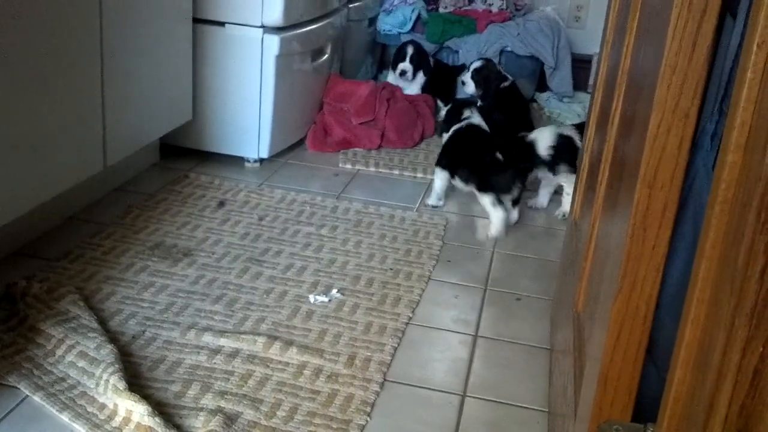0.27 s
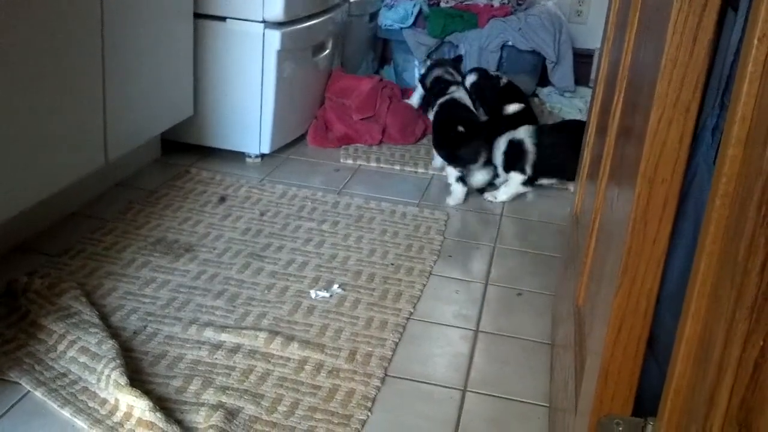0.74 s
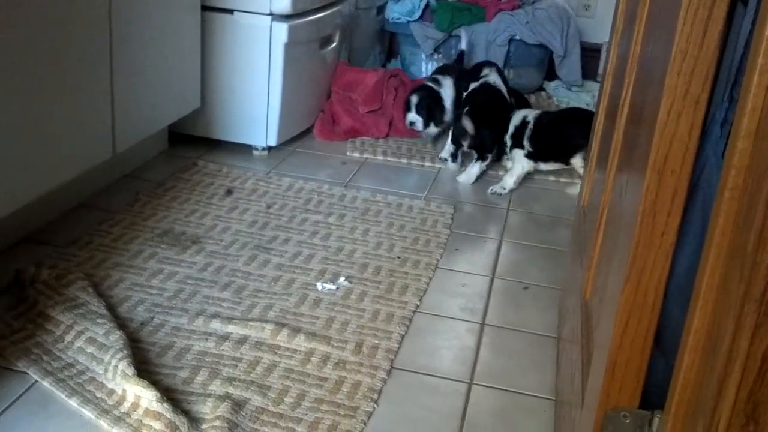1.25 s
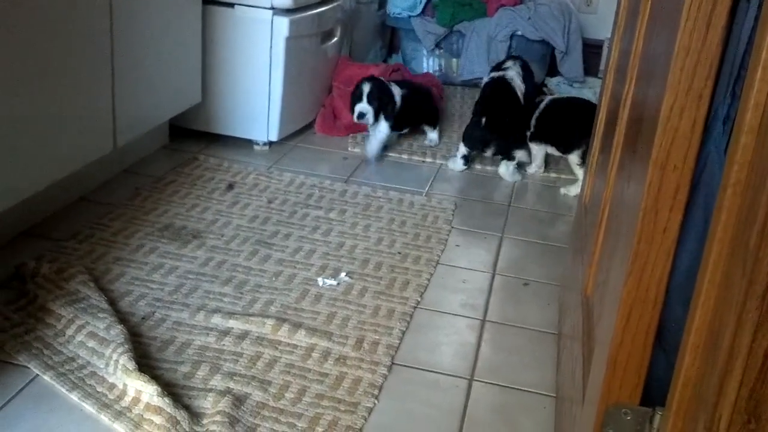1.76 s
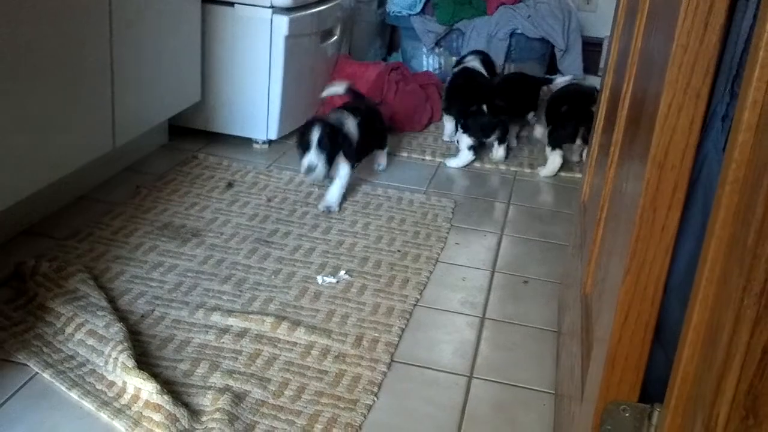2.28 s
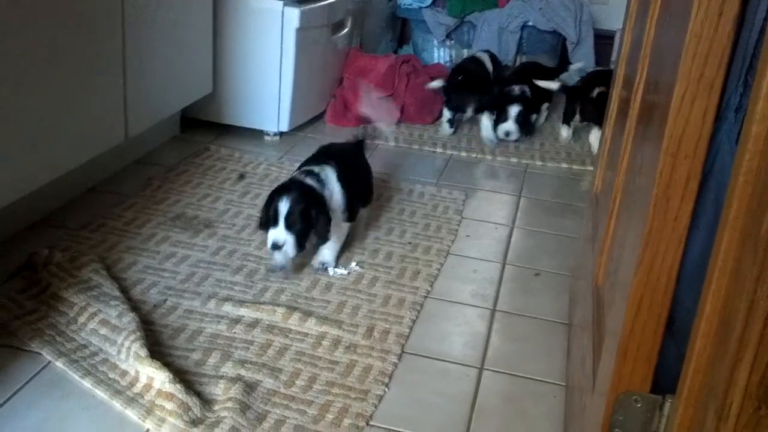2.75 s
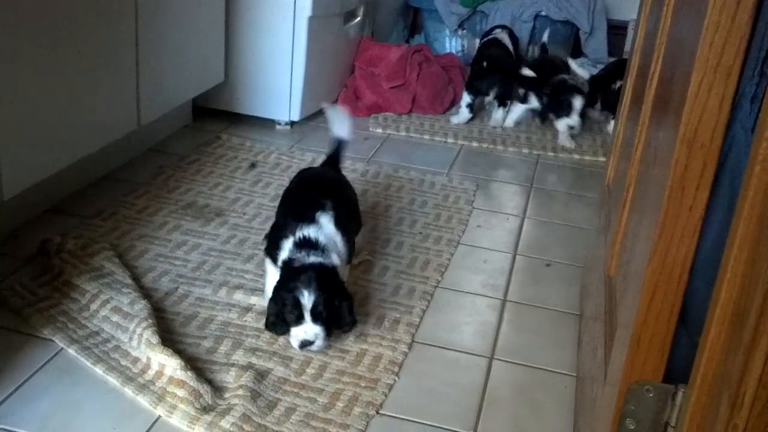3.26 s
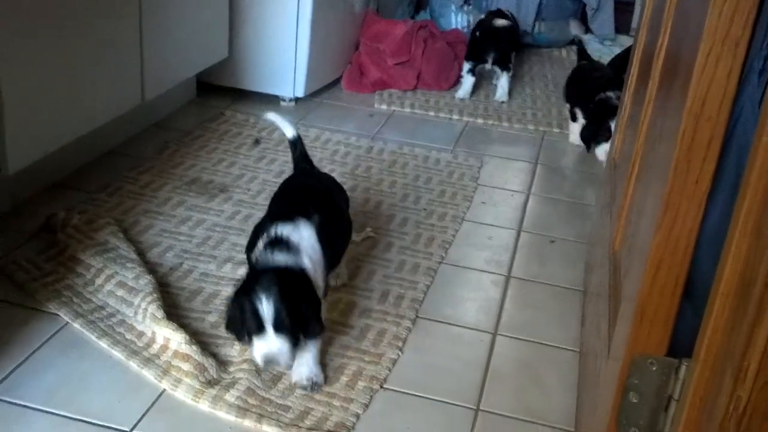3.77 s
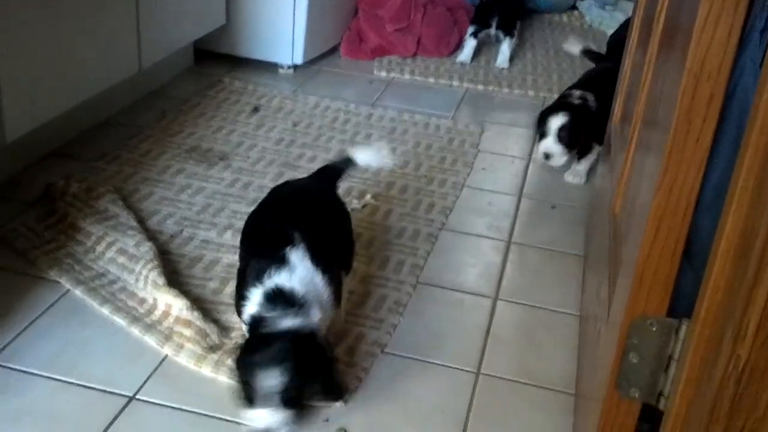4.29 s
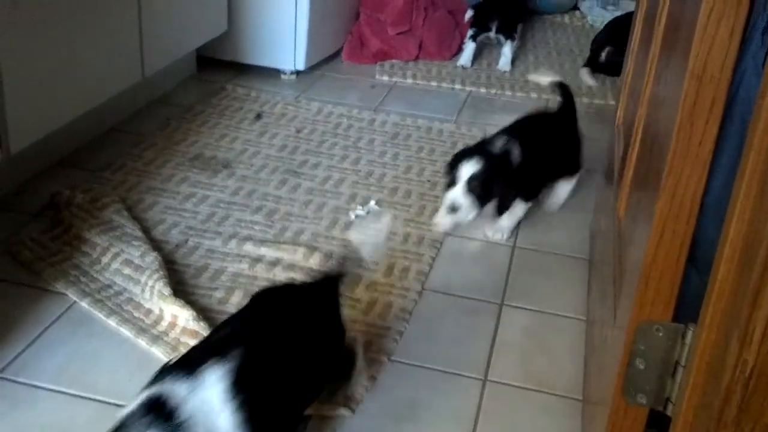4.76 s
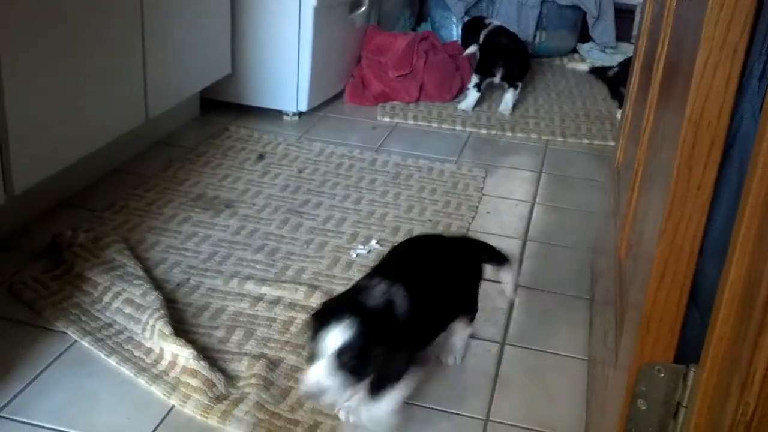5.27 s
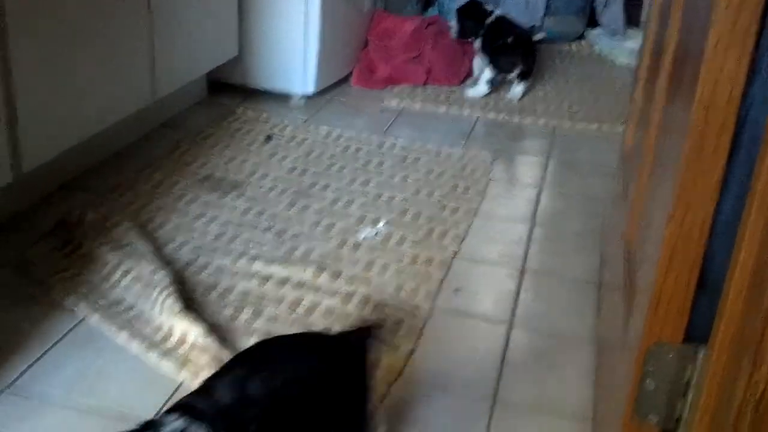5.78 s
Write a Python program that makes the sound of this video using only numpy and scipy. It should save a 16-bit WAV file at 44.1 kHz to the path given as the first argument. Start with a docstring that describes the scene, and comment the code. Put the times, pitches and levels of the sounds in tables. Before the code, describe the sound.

In a small tiled laundry room with a low, steady appliance rush, a puppy across the room gives short high squeals with thin whistling edges, then two louder cracked yelps. Lower whimpers follow as soft paws pad over a rug. Claws tick on the tile, sparse at first, then quickly, and a puppy scuffles loudly against the nearby stereo microphone with rubbing, scraping and bumps.

```python
"""A small tiled laundry room where an appliance hums and puppies tussle.
One whines across the room in a string of squeals and two cracked yelps: uneven vocal folds give
a throat tone, and air through the narrowed throat adds thin, very high whistles.
Another pads over the rug in puffs of noise and claws tick on tile as struck resonances.
One scuffles right beside the two-port microphone: rubbed fur, dragged claws, bumps and skids."""
import sys
import numpy as np
from scipy import signal
from scipy.fft import rfft, irfft, next_fast_len
from scipy.io import wavfile
from scipy.ndimage import uniform_filter1d

SR = 44100
rng = np.random.default_rng(int(sys.argv[2]) if len(sys.argv) > 2 else 0)


def inscribe(sig):
    """Save sig as 16-bit PCM at rate SR to the path in sys.argv[1].

    A 1-D sig is mono; a 2-D sig holds one channel per row.
    Samples are clipped to [-1, 1] before scaling.
    """
    pcm = np.round(np.clip(np.atleast_2d(sig).T, -1, 1) * 32767)
    wavfile.write(sys.argv[1], SR, pcm.astype(np.int16))


N = 265923
TIME = np.arange(N) / SR
PORT_SAMPLES = 16  # time sound takes from one port to the other, in samples
PORT_SIGNS = np.array([[1], [-1]])  # left port, right port

# air forced through the throat: f/Hz, relative level/dB
RASP_SPECTRUM = [(700, -27), (3000, -25), (4500, -23), (7000, 16.5), (10000, 13), (15000, 3)]


def from_db(db):
    """Decibels to gain."""
    return 10 ** (np.asarray(db) / 20)


def rms_one(x):
    """Scale to unit rms."""
    return x / np.sqrt(np.mean(x ** 2) + 1e-20)


def at_hz(points, hz):
    """Read a spectrum on a log-frequency axis."""
    f, value = np.transpose(points)
    return np.interp(np.log(np.maximum(hz, 1)), np.log(f), value)


def colour(x, spectrum):
    """Shape a signal by a spectrum in dB."""
    size = x.shape[-1]
    hz = np.fft.rfftfreq(size, 1 / SR)
    return irfft(rfft(x) * from_db(at_hz(spectrum, hz)), size)


def noise(spectrum):
    """Coloured noise of unit rms."""
    white = rng.standard_normal(next_fast_len(N))
    return rms_one(colour(white, spectrum)[:N])


def wander(t, rate):
    """Random motion around zero: straight lines between normal draws, `rate` draws a second."""
    knots = np.arange(0, N / SR + 1, 1 / rate)
    return np.interp(t, knots, rng.standard_normal(SR)[:len(knots)])


def resonate(x, modes):
    """A struck or rubbed body as parallel two-pole resonances of alternating sign."""
    out = 0
    for k, (hz, width, db) in enumerate(modes):
        r = np.exp(-np.pi * width / SR)
        poles = [1, -2 * r * np.cos(2 * np.pi * hz / SR), r * r]
        ring = signal.lfilter([1, 0, -1], poles, x + 1e-18)
        out = out + (-1) ** k * from_db(db) * (1 - r * r) / 2 * ring
    return out


def diffuse(size):
    """Spectra of white sound from all sides at the two ports: alike in the bass, unrelated above."""
    hz = np.fft.rfftfreq(size, 1 / SR)
    alike = np.sinc(2 * hz * PORT_SAMPLES / SR)
    mid, side = rfft(rng.standard_normal((2, size)))
    return hz, np.sqrt((1 + alike) / 2) * mid + np.sqrt((1 - alike) / 2) * side * PORT_SIGNS


def in_room(x, bearing, wet_db):
    """Direct sound from a bearing (-1 left to 1 right) plus the tiled room's tail, dying band by band."""
    # reverberation time: f/Hz, time to fall 60 dB/s
    decay_times = [(150, 0.2), (1200, 0.34), (4000, 0.28), (7000, 0.28), (14000, 0.16)]
    t = TIME[:SR // 2]
    hz, field = diffuse(len(t))
    band = np.round(np.log2(np.maximum(hz, 125)))
    tail = 0
    for octave in np.unique(band):
        decay = from_db(-60 * t / at_hz(decay_times, 2 ** octave))
        tail = tail + irfft(field * (band == octave), len(t)) * decay
    tail = tail * np.clip((t - .002) / 0.00039, 0, 1)  # the tail sets in after 2 ms
    response = from_db(wet_db) * tail / np.sqrt(np.sum(tail ** 2) / 2)
    taps = np.arange(2 * PORT_SAMPLES)
    arrival = PORT_SAMPLES * (1 + np.clip(bearing, -1, 1) * PORT_SIGNS / 2)
    response[:, taps] += np.sinc(taps - arrival)  # the nearer port hears it first
    response = response / np.sqrt(1 + from_db(2 * wet_db))  # direct and tail share unit energy
    return signal.fftconvolve(x[None], response, axes=1)[:, :N]


def appliance(hum_db, waver, direct_db=-3.0, left_bearing=0.51):
    """A steady rush of air fills the room, part of it straight from the left, with wavering motor lines."""
    # rush of air: f/Hz, relative level/dB
    air_spectrum = [(25, -40), (50, -18), (85, -15.5), (120, -1.5), (200, 3), (400, -3), (700, -4.5),
                    (1200, -11.5), (2200, -15), (4000, -23), (7000, -27), (11000, -31), (15000, -25.5)]
    # motor hum: f/Hz, relative rms level/dB
    hum_lines = [(118.4, -57.5), (209.5, -58.5), (269.2, -58.5), (360.7, -53.5), (479.1, -55),
                 (586.8, -60.5)]
    air_db, direct_top_hz = -42.5, 1100  # only the low rush comes straight
    size = next_fast_len(N)
    hz, field = diffuse(size)
    lead = PORT_SAMPLES * np.clip(left_bearing, -1, 1) * PORT_SIGNS
    from_left = np.exp(1j * np.pi * hz / SR * lead)
    direct = from_db(direct_db) * rfft(rng.standard_normal(size)) * from_left
    direct = direct / (1 + (hz / direct_top_hz) ** 4)
    air = rms_one(irfft((field + direct) * from_db(at_hz(air_spectrum, hz)), size)[:, :N])
    hum = 0
    for f, db in hum_lines:
        phase = 2 * np.pi * f * TIME + waver * wander(TIME, 9)
        hum = hum + np.sqrt(2) * from_db(db) * np.sin(phase)
    return from_db(air_db) * air + from_db(hum_db) * hum


def paws(rise_s, fall_s):
    """Pads press the rug and tile in short, soft puffs of noise."""
    # soft paw falls: t/s, relative level/dB
    falls = [(2.054, -51), (2.425, -55), (2.937, -48.5), (3.382, -51), (3.54, -48.5), (3.657, -48.5),
             (3.872, -51), (3.901, -48.5), (5.115, -52)]
    # colour of a paw fall: f/Hz, relative level/dB
    pad_spectrum = [(100, -23), (300, -27), (700, 14.5), (1500, 11.5), (2300, 6.5), (4000, -45),
                    (15000, -83)]
    press = 0
    for s, db in falls:
        age = np.maximum(TIME - s, 0)
        puff = (1 - np.exp(-age / rise_s)) * np.exp(-np.minimum(age / fall_s, 20))
        press = press + from_db(db) * puff
    return press * noise(pad_spectrum)


def contact(s, db, length, modes, scratch):
    """A sharp tap and a brief gritty scratch, ringing the modes."""
    grit_db = 4.5
    t = TIME[:SR // 8]
    grit = rng.standard_normal(len(t)) * from_db(grit_db * wander(t, 1500))
    hit = scratch * rms_one(grit) * np.exp(-t / length)
    hit[0] = 1  # the tap itself
    tap_peak = np.abs(resonate(signal.unit_impulse(len(t)), modes)).max()
    out, start = np.zeros(N + SR), int(s * SR)
    out[start:start + len(t)] = from_db(db) * resonate(hit, modes) / tap_peak
    return out[:N]


def contacts(rows, modes, scratch):
    """A run of contacts on the same body."""
    return sum(contact(s, db, length, modes, scratch) for s, db, length in rows)


def landings(scratch):
    """Paws land with the body's weight on them and the floor answers with one low mode."""
    # landings: t/s, relative tap level/dB, scratch length/s
    landing_rows = [(2.05, -27, 0.0091), (2.42, -23.5, 0.0031)]
    # floor resonance: f/Hz, width/Hz, level/dB
    floor_modes = [(210, 64, 0)]
    return contacts(landing_rows, floor_modes, scratch)


def claw_ticks(scratch):
    """Claws and hard contacts crack, each with a broad ring of its own over the tile's modes."""
    # ticks: t/s, relative tap level/dB, scratch length/s, own ring f/Hz
    ticks = [(2.044, -32.5, 0.0052, 4000), (2.407, -42, 0.014, 4000), (4.6932, -11.5, 0.001, 6670),
             (4.715, -24, 0.0017, 4000), (4.822, -36, 0.0027, 7000), (4.9742, -8.5, 0.001, 3900),
             (5.136, -37.5, 0.034, 3560), (5.4825, -15, 0.0013, 3900), (5.494, -17.5, 0.0027, 6850),
             (5.597, -11, 0.00016, 4130), (5.612, -11, 0.00085, 3900), (5.65, -15, 0.0011, 3700),
             (5.6644, -8.5, 0.00089, 3800)]
    # tile resonances: f/Hz, width/Hz, level/dB
    tile_modes = [(1840, 1700, 8.5), (4000, 2700, 11), (6660, 5200, 12), (9800, 2700, 11),
                  (14600, 2200, 10)]
    ring_width_hz, ring_db = 650, 15
    out = 0
    for s, db, length, ring_hz in ticks:
        modes = [(ring_hz, ring_width_hz, ring_db)] + tile_modes
        out = out + contact(s, db, length, modes, scratch)
    return out


def bumps(scratch):
    """Dull bumps close by: taps and scratches ring broad low and middle modes."""
    # bumps: t/s, relative tap level/dB, scratch length/s
    bump_rows = [(5.599, -24, 0.0004), (5.742, -18.5, 0.0093), (5.767, -19, 0.0073), (5.791, -20, 0.0059),
                 (5.834, -18, 0.001), (5.9202, -6.5, 0.0013), (5.9285, -12, 0.002), (5.965, -15, 0.0015)]
    # resonances of the bumped body: f/Hz, width/Hz, level/dB
    bump_modes = [(366, 70, 7), (1120, 370, 9), (1620, 910, 4.5), (2530, 450, -8)]
    return contacts(bump_rows, bump_modes, scratch)


def skids(scratch):
    """Paws skid and a narrow resonance gives each a short squeak."""
    # skids: t/s, relative tap level/dB, scratch length/s
    skid_rows = [(5.841, -14.5, 0.0043), (5.883, -9.5, 0.0058)]
    # squeak resonances: f/Hz, width/Hz, level/dB
    squeak_modes = [(2520, 207, 6), (3920, 780, -4)]
    return contacts(skid_rows, squeak_modes, scratch)


def thuds(scratch):
    """A body slumps against the floor and rings one low mode."""
    # slumps: t/s, relative tap level/dB, scratch length/s
    thud_rows = [(5.945, -22.5, 0.024)]
    # resonance of the slump: f/Hz, width/Hz, level/dB
    thud_modes = [(437, 77, 0)]
    return contacts(thud_rows, thud_modes, scratch)


def strokes(rows):
    """Pressure of sliding strokes: each builds to its peak and dies away."""
    pressure = 0
    for s, db, rise, fall in rows:
        distance = np.maximum((s - TIME) / rise, (TIME - s) / fall)
        pressure = pressure + from_db(db) * np.exp(-np.minimum(distance, 20))
    return pressure


def scuffle(slip_db, snags_per_s=220, crackle_db=-6):
    """Fur rubs in grains and snags in tiny ticks; dragged claws stick and slip and ring a surface."""
    # fur rubbing past, a row a stroke: peak t/s, relative level/dB, rise/s, fall/s
    rubs = [(5.505, -44.5, 0.0068, 0.05), (5.596, -26, 0.032, 0.011), (5.675, -23, 0.021, 0.04),
            (5.762, -26, 0.018, 0.03), (5.92, -37.5, 0.081, 0.015)]
    # claws dragged along, a row a stroke: peak t/s, relative level/dB, rise/s, fall/s
    drags = [(5.60, -31.5, 0.13, 0.0089), (5.659, -11.5, 0.013, 0.0096), (5.676, -8.5, 0.0075, 0.019)]
    # rubbed fur: f/Hz, relative level/dB
    fur_spectrum = [(100, -40), (350, -5.5), (1000, -0.5), (1800, 1), (3500, 0), (7000, -12),
                    (11000, -10.5), (15000, -19)]
    # brittle fibres catching: f/Hz, relative level/dB
    crackle_spectrum = [(1000, -19), (4000, 3), (9000, -8), (14000, 1)]
    # scraped surface: f/Hz, width/Hz, level/dB
    scrape_modes = [(2800, 410, 3.5), (3900, 1060, -1), (5400, 3600, -32)]
    start_s, grain_db = 5.483, 4  # the coat first touches; unevenness of the fur
    fur = rms_one(noise(fur_spectrum) * from_db(grain_db * wander(TIME, 500)))
    size = next_fast_len(N)
    snags = (rng.random(size) < snags_per_s / SR) * rng.standard_normal(size)
    crackle = from_db(crackle_db) * rms_one(colour(snags, crackle_spectrum)[:N])
    stick_slip_db = slip_db * (wander(TIME, 630) + wander(TIME, 110))
    slips = rng.standard_normal(N) * from_db(stick_slip_db)
    scrape = rms_one(resonate(slips, scrape_modes))
    return (TIME > start_s) * ((fur + crackle) * strokes(rubs) + scrape * strokes(drags))


def utter(start, peak, end, edge_s=.005):
    """Span, times and soft gate of a call, with how much swell is to come and how far it faded (0-1)."""
    span = (TIME > start - edge_s) & (TIME < end + edge_s)
    t = TIME[span]
    gate = np.clip(np.minimum(t - start, end - t) / edge_s + 1, 0, 1)
    to_come = np.interp(t, [start, peak], [1, 0])
    faded = np.interp(t, [peak, end], [0, 1])
    return span, t, np.sqrt(2) * gate, to_come, faded  # root 2 brings a sine to unit rms


def folds(t, hz, tone, overtones, rough, air, jitter=0.031, lurch=0.029, flutter_db=4):
    """Vocal folds: a nearly pure tone; strain unsettles the pitch and rattles overtones and puffs of air."""
    # overtone colour of the throat: f/Hz, relative level/dB
    throat = [(1100, 18), (1700, 1), (2400, -6.5), (3200, 1.5), (3750, -8), (4500, -2), (5500, -38.5),
              (8000, -6.5), (11000, -22.5)]
    doubling, rattle_hz, rattle_depth = .6, 150, .9
    uneven = jitter * wander(t, 900) + lurch * wander(t, 170)
    phase = 2 * np.pi * np.cumsum(hz * (1 + rough * uneven)) / SR
    upper = 0
    for k in range(2, 8):
        gain = from_db(at_hz(throat, k * hz) + flutter_db * rough * wander(t, 130))
        upper = upper + gain * np.sin(k * phase)
    # strong and weak cycles alternate in fits
    upper = upper * (1 + doubling * rough * wander(t, 700) * np.sin(phase / 2))
    upper = upper + air * (1 + np.sin(phase)) / 2  # a puff every cycle
    rattle = 1 + rattle_depth * rough * np.sin(2 * np.pi * rattle_hz * t + wander(t, 60))
    flutter = from_db(flutter_db * rough * wander(t, 300))
    return flutter * (tone * np.sin(phase) + rattle * overtones * upper)


def squeals(rasp_db=-9, strain=1.0):
    """Short cries slide to their peak and relax; the stronger the overtones, the rougher the voice."""
    # a row a syllable: start t/s, swell/s, length/s, opening f/Hz, peak f/Hz, closing f/Hz,
    # relative peak level/dB, relative overtone level/dB
    syllables = [ (0.124, 0.0062, 0.038, 1405, 1368, 1360, -17, -44),
                 (0.48, 0.0084, 0.1, 1525, 1615, 1693, -36, -53),
                 (0.578, 0.019, 0.052, 1244, 1120, 1023, -35, -53),
                 (0.829, 0.04, 0.071, 1280, 1159, 1110, -28, -45),
                 (1.226, 0.019, 0.07, 1377, 1460, 1609, -31, -47.5),
                 (1.32, 0.0152, 0.033, 1325, 1225, 1074, -32, -49.5),
                 (2.143, 0.032, 0.082, 697, 817, 866, -31, -44.5),
                 (2.573, 0.044, 0.043, 540.5, 606, 600, -33, -62.5)]
    swell_db, fade_db = 7, 10.5  # rise up to the peak, fall after it
    overtones_follow = 0.85  # share of that swing which the overtones make
    settle_s = 0.024  # the pitch relaxes towards its closing value
    out, air = np.zeros(N), from_db(rasp_db) * noise(RASP_SPECTRUM)
    for start, swell, length, open_hz, peak_hz, close_hz, peak_db, overtones_db in syllables:
        span, t, gate, to_come, faded = utter(start, start + swell, start + length)
        relaxed = 1 - np.exp(-np.maximum(t - start - swell, 0) / settle_s)
        hz = peak_hz + (open_hz - peak_hz) * to_come + (close_hz - peak_hz) * relaxed
        effort_db = -swell_db * to_come - fade_db * faded
        tone = from_db(peak_db + effort_db)
        overtones = from_db(overtones_db + overtones_follow * effort_db)
        rough = strain * np.sqrt(np.minimum(overtones / tone, 1))
        out[span] += gate * folds(t, hz, tone, overtones, rough, air[span])
    return out


def yelps(rasp_db=-8):
    """Longer cries follow courses of pitch, level and roughness through loud tones and cracks."""
    # one course a yelp, its rows: t/s, f/Hz, relative level/dB, relative overtone level/dB, roughness/0-1
    courses = [
        [(1.517, 1542, -51, -39, 0.54), (1.53, 1670, -35, -39, 0.47), (1.545, 1512, -34.5, -30, 0.2),
         (1.571, 1549, -27.5, -45.5, 0.4), (1.581, 1450, -15.5, -33.5, 0.27), (1.612, 1413, -21, -44, 0.26),
         (1.622, 1268, -22.5, -31.5, 0.77), (1.64, 1302, -40, -66, 0.83), (1.657, 1231, -23, -53, 0.7)],
        [(1.814, 904, -36, -45, 0.14), (1.836, 987, -26, -39, 0.2), (1.852, 1159, -25, -33, 0.32),
         (1.876, 1171, -22, -50, 0.36), (1.903, 1157, -37, -44, 0.08), (1.928, 1100, -20, -40, 0.18),
         (1.934, 890, -29.5, -37.5, 0.22), (1.962, 923, -52.5, -63, 0.3), (1.98, 828, -36, -47.5, 0.2)],
    ]
    out, air = np.zeros(N), from_db(rasp_db) * noise(RASP_SPECTRUM)
    for course in courses:
        s, *columns = np.transpose(course)
        span, t, gate, _, _ = utter(s[0], s[1], s[-1])
        hz, db, overtones_db, rough = (np.interp(t, s, c) for c in columns)
        out[span] += gate * folds(t, hz, from_db(db), from_db(overtones_db), rough, air[span])
    return out


def whistles(voice, jitter=0.015, flutter_db=6, hiss_db=-7, full_chop_db=-32):
    """Air whistles through the narrowed throat, breaks to a steadier register; the folds chop the flow."""
    # a row a whistle: start t/s, break t/s, end t/s, f before the break/Hz, f after it/Hz,
    # glide before/Hz per s, glide after/Hz per s, relative level before/dB, after/dB,
    # octave re whistle/dB, roughness/0-1
    whistle_rows = [ (0.116, 0.168, 0.27, 7050, 6856, -5000, -4200, -48, -39, -1, 0.33),
                    (0.465, 0.522, 0.66, 7290, 6710, -3500, -2500, -49.5, -43, -2, 0.81),
                    (0.874, 0.887, 0.984, 7390, 6760, -4000, -2000, -45.5, -43, -2.5, 0.77),
                    (1.278, 1.333, 1.378, 7010, 6630, -7000, -4000, -43.5, -38.5, 2, 0.6),
                    (1.508, 1.619, 1.683, 7120, 6540, -2700, -3500, -46.5, -34, 1, 0.5),
                    (1.876, 1.899, 1.9, 6200, 6120, 5000, 8000, -53.5, -51, 8, 0.68),
                    (1.852, 1.936, 1.997, 7420, 6460, 3502, 400, -48, -40, 1.5, 0.56),
                    (2.196, 2.246, 2.3, 6930, 7130, 4501, 4000, -44.5, -41, -3.5, 0.11)]
    # strength of the octave: f/Hz, relative level/dB
    octave_spectrum = [(12700, 1.5), (13500, 5.5), (14400, -0.5), (15000, -21)]
    # hiss around the whistle: f/Hz, relative level/dB
    hiss_spectrum = [(4500, -36), (7400, 11), (10500, -1), (14000, -5)]
    swell_db, fade_db = 1, 12  # rise up to the break, fall after it
    steadied = 0.57  # share of the roughness left after the break
    breath, lurch, chop = .9, .034, .38
    out, hiss = np.zeros(N), from_db(hiss_db) * noise(hiss_spectrum)
    for (start, jump, end, first_hz, second_hz, first_glide, second_glide,
         first_db, second_db, octave_db, roughness) in whistle_rows:
        span, t, gate, to_come, faded = utter(start, jump, end)
        before = t < jump
        first_course = first_hz + first_glide * (t - jump)
        second_course = second_hz + second_glide * (t - jump)
        hz = np.where(before, first_course, second_course)
        db = np.where(before, first_db - swell_db * to_come, second_db - fade_db * faded)
        rough = roughness * np.where(before, 1, steadied)
        uneven = jitter * wander(t, 600) + lurch * wander(t, 90)
        phase = 2 * np.pi * np.cumsum(hz * (1 + rough * uneven)) / SR
        octave_flutter_db = flutter_db * rough * wander(t, 110)
        octave_gain = from_db(octave_db + at_hz(octave_spectrum, 2 * hz) + octave_flutter_db)
        tone = np.sin(phase) + octave_gain * np.sin(2 * phase + rough * wander(t, 800))
        # turbulence around the pitch
        turbulence = wander(t, 1000) * np.cos(phase) + wander(t, 1000) * np.sin(phase)
        tone = tone + breath * rough * turbulence
        level = from_db(uniform_filter1d(db, size=256) + flutter_db * rough * wander(t, 160))
        out[span] += gate * level * (tone + rough * hiss[span])
    return out * (1 + chop * np.tanh(voice / from_db(full_chop_db)))  # adds side tones


def scene():
    """The whine is across the room, its whistle mostly off the walls; the scuffle is within reach."""
    voice = squeals() + yelps()
    far = from_db(6.5) * whistles(voice)
    far = far + from_db(13.0) * paws(rise_s=0.0002, fall_s=0.0078)
    far = far + landings(scratch=0.098)
    close = scuffle(slip_db=2.5) + bumps(scratch=0.24) + skids(scratch=0.41) + thuds(scratch=0.15)
    sounds = appliance(hum_db=0.0, waver=0.68)
    sounds = sounds + in_room(far, bearing=0.17, wet_db=4.5)
    sounds = sounds + in_room(claw_ticks(scratch=0.37), bearing=-0.073, wet_db=-5.5)
    sounds = sounds + in_room(close, bearing=0.36, wet_db=-7.5)
    return sounds + in_room(voice, bearing=0.096, wet_db=2.0)


def gain_control(x, threshold_db, most_db, release_db_per_s, attack_s):
    """A loud peak turns the gain down, by a limited amount; it creeps back."""
    peak_db = 20 * np.log10(np.abs(x).max(axis=0) + 1e-9)
    over = np.clip(peak_db - threshold_db, 0, most_db)
    release = release_db_per_s * TIME
    held = np.maximum.accumulate(over + release) - release
    r = np.exp(-1 / (attack_s * SR))
    return x * from_db(-signal.lfilter([1 - r], [1, -r], held))


def record(dry, shelf_hz=850, bass_hz=70, right_db=-2.5):
    """Each channel is one port minus the delayed other, aiming it sideways; a shelf restores the bass."""
    right_shade, cutoff_hz = .38, 15700
    left, right = dry
    treble = signal.sosfilt(signal.butter(2, 2000, "high", fs=SR, output="sos"), right)
    right = right - right_shade * treble  # this port is duller
    ports = np.array([left, from_db(right_db) * right])
    delayed_other = np.pad(ports[::-1], ((0, 0), (PORT_SAMPLES, 0)))[:, :N]
    aimed = (ports - delayed_other) / 2
    shelf_zero = np.exp(-2 * np.pi * shelf_hz / SR)
    bass_pole = np.exp(-2 * np.pi * bass_hz / SR)
    full = signal.lfilter([1, -shelf_zero], [1, -bass_pole], aimed)
    held = gain_control(full, threshold_db=-12.0, most_db=12.0, release_db_per_s=4, attack_s=0.009)
    return signal.sosfilt(signal.ellip(10, .2, 80, cutoff_hz, fs=SR, output="sos"), held)


dry = scene()
out = record(dry)
inscribe(out)
```